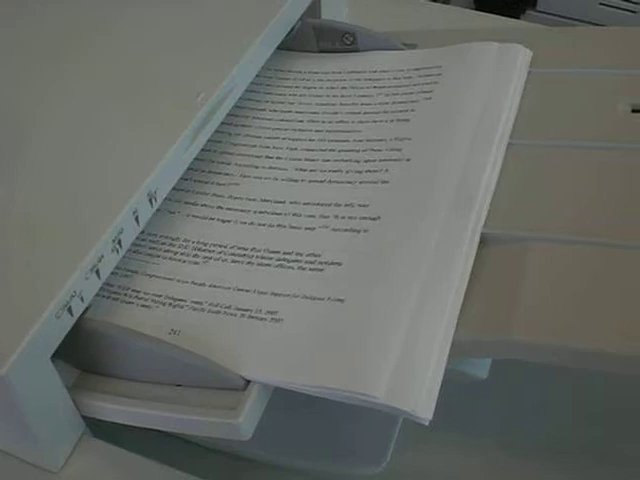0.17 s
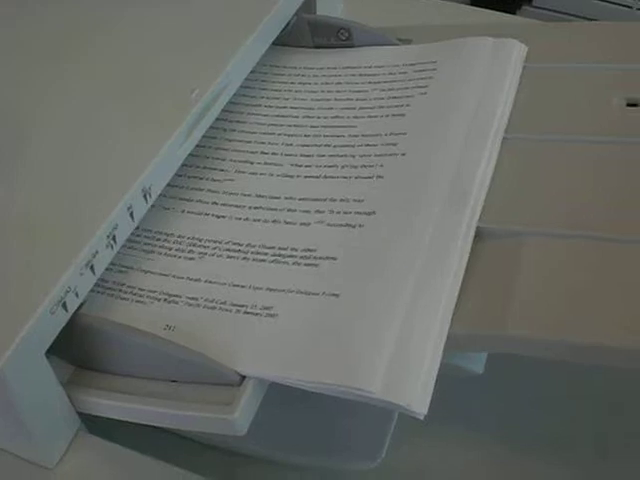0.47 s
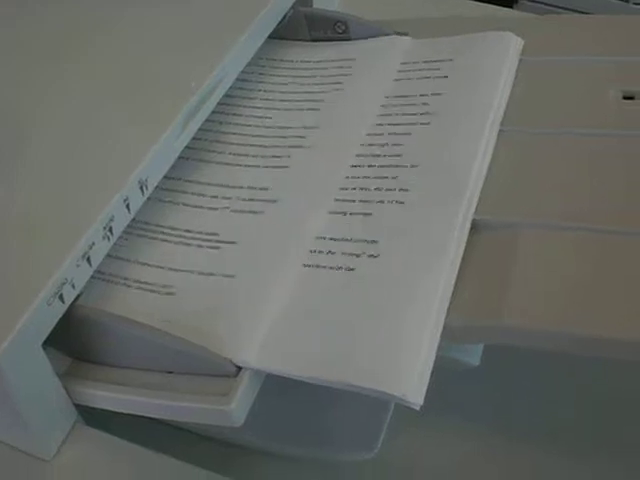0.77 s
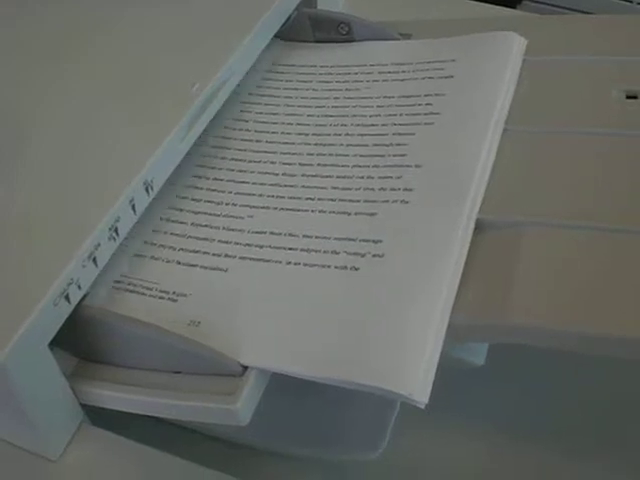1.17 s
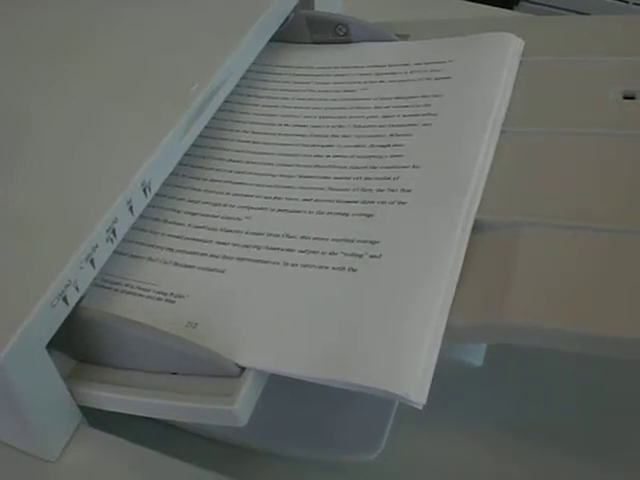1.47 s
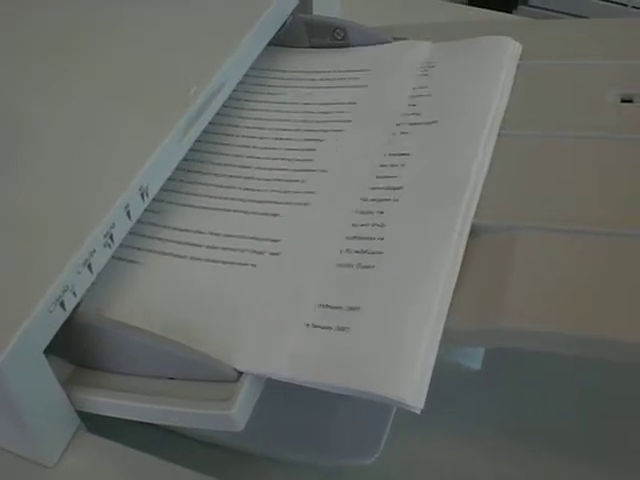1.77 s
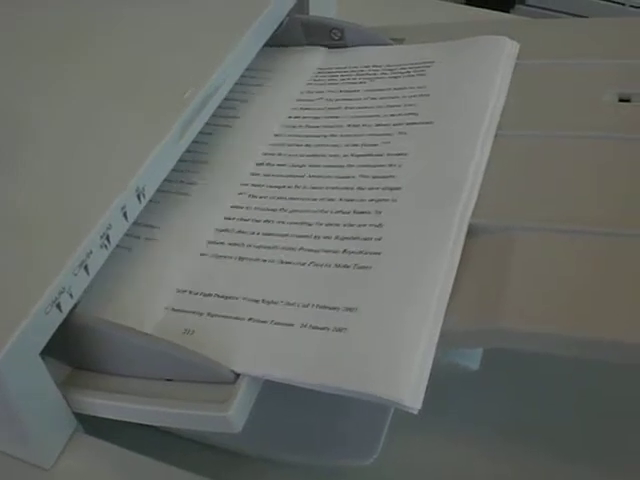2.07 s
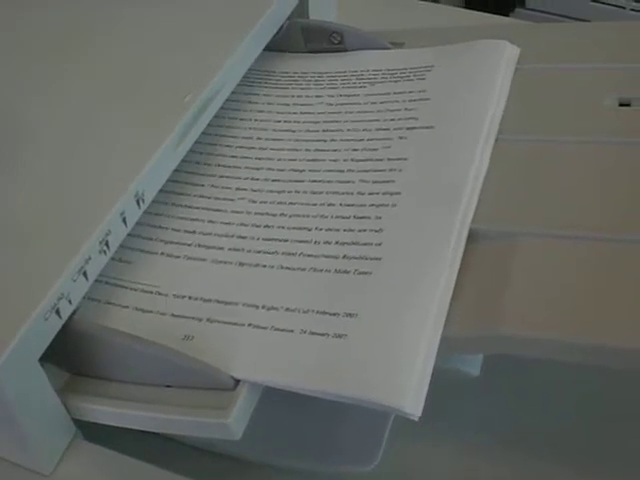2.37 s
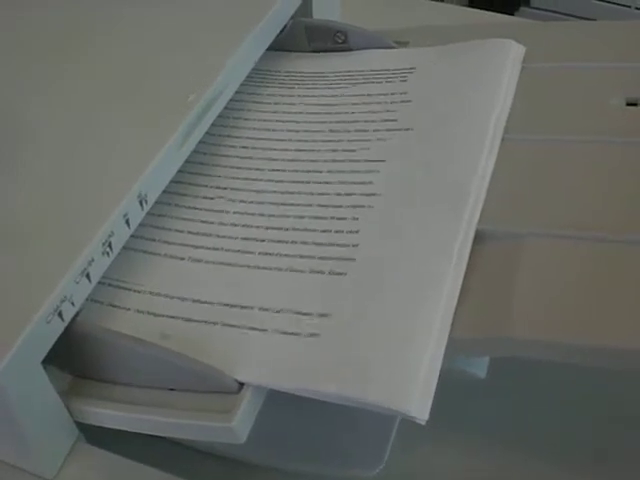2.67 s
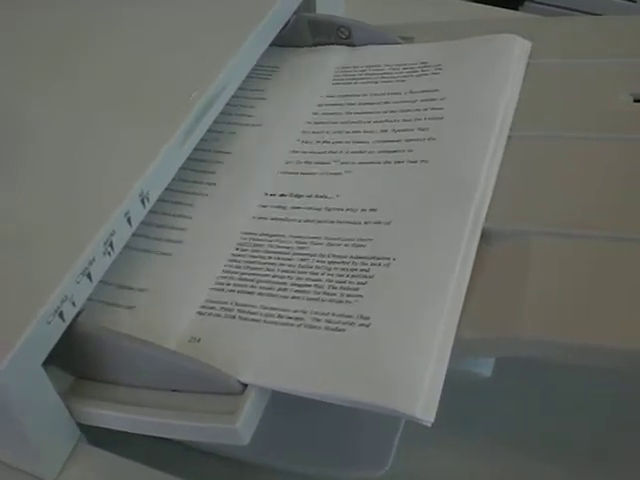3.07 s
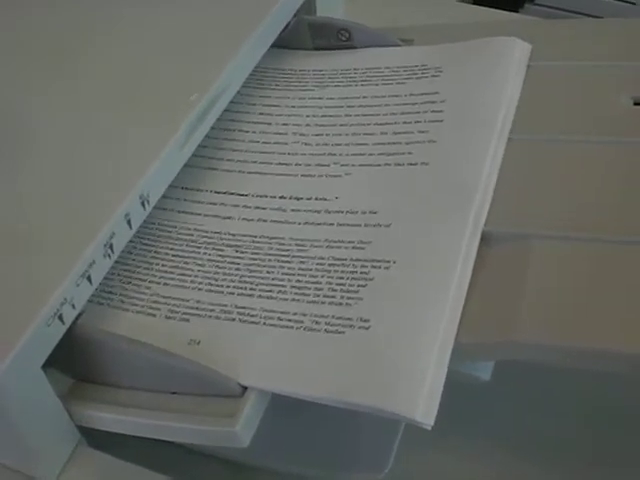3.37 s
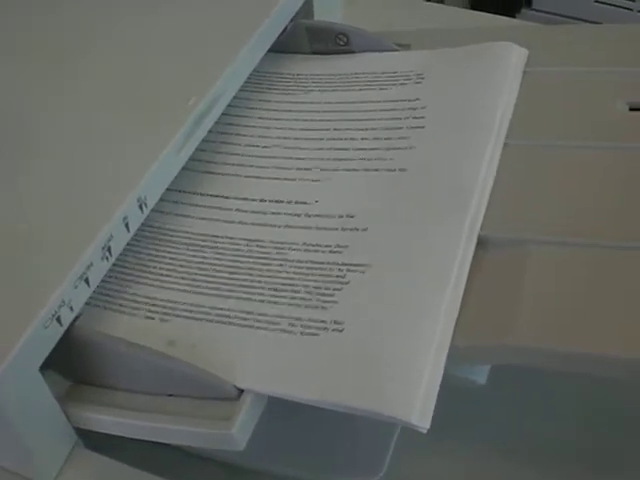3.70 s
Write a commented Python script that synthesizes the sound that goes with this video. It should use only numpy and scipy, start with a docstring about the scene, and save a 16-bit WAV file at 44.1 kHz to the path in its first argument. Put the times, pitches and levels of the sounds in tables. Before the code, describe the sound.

Photocopier running close by: whirring gears, motor whine, paper hiss and plastic clacks per sheet

```python
"""A photocopier delivers about one sheet a second onto a stack, heard from just above the tray.
The sound cuts in on the whirr of fans and gears (shaped noise and ticks), dull clunks and a thin whistle.
Two motor whines (wavering sines) enter, the whistle stops and paper hisses through the guides (noise).
Per sheet a plastic flap clacks, exit rollers hum and rattle, and a clutch lets go with a thud (noise bursts
through resonances); small parts knock in between."""
import sys
import numpy as np
from scipy import signal
from scipy.fft import rfft, irfft, next_fast_len
from scipy.io import wavfile
from scipy.ndimage import uniform_filter1d

SR = 44100
rng = np.random.default_rng(int(sys.argv[2]) if len(sys.argv) > 2 else 0)


def master(y):
    """Save y as 16-bit WAV."""
    cut = np.clip(np.atleast_2d(y).T, -1, 1)
    pcm = np.round(cut * 32767)  # scale
    wavfile.write(sys.argv[1], SR, pcm.astype(np.int16))


N = 169344

FEED_START_S = 0.375
ROLLER_TURN_HZ = 15
# broad response of the housing: hz, relative_db_per_hz
HOUSING_SPECTRUM = [(50, -13), (150, -20.5), (300, 5.5), (900, -1), (2000, -4.5), (4300, -9), (6000, -18),
                    (10000, -23), (16000, -22)]


def amp(db):
    """Amplitude factor of a level in dB."""
    return 10 ** (np.asarray(db) / 20)


def unit(x):
    """Scale to an rms of 1."""
    return x / np.sqrt(np.mean(x ** 2))


def clock():
    """Time of each sample in s."""
    return np.arange(N) / SR


def walk(rate_hz):
    """Smooth random wander of rms 1: held random values, averaged twice."""
    hold = max(int(SR / rate_hz), 1)
    steps = rng.standard_normal(N)[np.arange(N) // hold]
    return unit(uniform_filter1d(uniform_filter1d(steps, hold), hold))


def gate(start_s, end_s, ramp_s):
    """1 between two times, with straight ramps centred on them."""
    t = clock()
    inside_s = np.minimum(t - start_s, end_s - t)
    return np.clip(inside_s / ramp_s + 0.5, 0, 1)


def body(x, spectrum, modes):
    """Minimum-phase filter: a broad spectrum with resonances on top."""
    n = 2 * next_fast_len(N // 2 + 4096)
    f = np.arange(n // 2 + 1) * SR / n + 1  # 1 Hz offset avoids log(0)
    points = np.array(spectrum)
    db = np.interp(np.log(f), np.log(points[:, 0]), points[:, 1])
    for hz, width_hz, peak_db in modes:
        db = db + peak_db / (1 + (2 * (f - hz) / width_hz) ** 2)
    # folding the cepstrum makes the response causal
    cepstrum = irfft(np.log(amp(db)))
    cepstrum[1:n // 2] *= 2
    cepstrum[n // 2 + 1:] = 0
    response = np.exp(rfft(cepstrum))
    return irfft(rfft(x, n) * response)[:N]


def ticks(rate_hz, scatter_db):
    """Random tiny impacts of uneven size and either sign."""
    hits = rng.random(N) < rate_hz / SR
    sign = np.sign(rng.standard_normal(N))
    size = amp(scatter_db * np.clip(rng.standard_normal(N), -2, 2))
    return unit(hits * sign * size)


def smear(x):
    """Reflections in the housing blur each tick into a short rasp: decaying energy, random signs."""
    decay_s = 0.0036
    tail = np.exp(-2 * np.arange(2048) / SR / decay_s)
    power = np.abs(signal.fftconvolve(x ** 2, tail)[:N])
    return unit(np.sqrt(power) * np.sign(rng.standard_normal(N)))


def rasp(rate_hz, scatter_db):
    """Ticks blurred by the housing."""
    return smear(ticks(rate_hz, scatter_db))


def tone(hz, wander_hz, flutter_db, rate_hz):
    """A motor line that wavers a little in pitch and level, at rms 1."""
    flutter = amp(flutter_db * walk(rate_hz))
    phase = 2 * np.pi * np.cumsum(hz + wander_hz * walk(rate_hz)) / SR
    return unit(np.sin(phase) * flutter)


def turning(hz, depth, wander):
    """Swell of level once per turn of a wheel of slightly uneven speed."""
    speed_hz = hz * (1 + wander * walk(4.81))
    return 1 + depth * np.sin(2 * np.pi * np.cumsum(speed_hz) / SR)


def strikes(blows, spectrum, modes, rise_s, tail_db, tail_s):
    """Each blow starts abruptly, swells as a short chatter of contacts and rings a body, with a faint room tail."""
    first_contact_db = -4.5  # relative to the peak
    t = clock()
    power = np.zeros(N)
    for start_s, level_db, decay_s in blows:
        age = np.maximum(t - start_s, 0)
        fall = np.maximum(age - rise_s, 0)
        attack = (t > start_s) * amp(first_contact_db * np.maximum(1 - age / rise_s, 0))
        ring = np.exp(-2 * fall / decay_s)
        room = amp(tail_db) ** 2 * np.exp(-2 * fall / tail_s)
        power += (amp(level_db) * attack) ** 2 * (ring + room)
    chatter = np.sign(rng.standard_normal(N))
    steady_rms = np.std(body(chatter, spectrum, modes))
    return body(chatter * np.sqrt(power), spectrum, modes) / steady_rms


def flap():
    """The plastic flap and its bounces: bright, short clacks ringing high resonances."""
    # start_s, level_db, decay_s
    clacks = [(.339, -37, .004), (.552, -34, .006), (.5765, -16, 0.0043), (.589, -13.5, 0.0041),
              (.596, -24, 0.0054), (.6254, -30, .012), (.689, -25.5, 0.0049), (1.4914, -35, .004),
              (1.581, -18.5, 0.0067), (1.5862, -13.5, 0.0056), (1.5995, -21, 0.0045),
              (1.6221, -27.5, 0.011), (1.686, -31, .006), (1.6914, -26, 0.0041), (2.078, -36, .008),
              (2.467, -34, 0.004), (2.5884, -14.5, 0.0067), (2.6243, -22, 0.0047), (2.6365, -19.5, 0.0041),
              (2.6485, -17, 0.0021), (2.746, -29, .008), (3.1405, -31, .005), (3.528, -35, .008),
              (3.5777, -28, 0.0039), (3.641, -29, .006), (3.6475, -16, 0.0098), (3.6869, -19.5, 0.0075),
              (3.7054, -24.5, 0.0061), (3.7942, -25, 0.0054), (3.8201, -32, 0.011)]
    # hz, relative_db_per_hz
    spectrum = [(100, -20), (600, -14), (2000, 0), (4000, 0), (8000, 1), (11000, 0.5), (14500, 0),
                (16000, -1.5)]
    # hz, width_hz, peak_db over the spectrum
    modes = [(2720, 260, 7), (3200, 200, 6), (4410, 160, 5), (5850, 200, 6), (6350, 380, 9), (9000, 200, 6),
             (9350, 340, 10), (10300, 200, 5), (11800, 240, 7), (12750, 300, 5), (13300, 260, 11)]
    return strikes(clacks, spectrum, modes, rise_s=0.0013, tail_db=-32, tail_s=0.025)


def clutches():
    """Clutches and levers thud inside the housing and ring its lower resonances."""
    # start_s, level_db, decay_s
    thuds = [(.33, -22.5, 0.003), (.364, -39, 0.0065), (.577, -24, .01), (.594, -18, 0.01),
             (.687, -27, 0.0053), (.909, -16, 0.0087), (1.016, -17.5, 0.012), (1.318, -27, 0.011),
             (1.471, -26, 0.016), (1.581, -26, 0.01), (1.601, -22.5, 0.019), (1.687, -17, 0.004),
             (1.722, -25, 0.0061), (1.9685, -13, 0.0078), (2.076, -22, 0.01), (2.167, -26, 0.0091),
             (2.533, -23.5, 0.0072), (2.647, -20.5, 0.014), (2.748, -22.5, 0.012), (3.0145, -14, 0.0095),
             (3.12, -20.5, 0.01), (3.139, -15.5, 0.0037), (3.218, -24, 0.011), (3.578, -18.5, .009),
             (3.689, -26, 0.013), (3.708, -21.5, 0.017), (3.796, -18.5, 0.0063), (3.823, -21.5, 0.0063)]
    # hz, width_hz, peak_db over the spectrum
    modes = [(330, 41, 1.7), (639, 33, 8.1), (1210, 210, 4.9), (1810, 110, 4.9), (2670, 160, 7.5),
             (3170, 180, 5.6), (4130, 680, 3.7)]
    return strikes(thuds, HOUSING_SPECTRUM, modes, rise_s=0.0022, tail_db=-20.5, tail_s=0.09)


def exit_rollers():
    """A stepper motor hums and the rollers rattle while a sheet is pushed out."""
    # start_s, end_s, relative_db
    runs = [(0.57, 0.904, -1), (1.597, 1.987, -1.5), (2.634, 3.04, -2), (3.731, 3.95, -0.5)]
    # hz, rms_db before the run level
    tones = [(361, -27), (540, -38.5), (1083, -51)]
    # hz, relative_db_per_hz
    spectrum = [(50, -32), (170, -4), (320, -4), (700, 4), (1100, 2.5), (1800, 0), (3000, -4.5),
                (5000, -11), (7000, -17.5), (11500, -16), (16000, -20)]
    # hz, width_hz, peak_db over the spectrum
    modes = [(540, 30, 4), (890, 60, 4), (2385, 120, 4), (2860, 100, 5), (4235, 110, 10), (4820, 130, 5)]
    rattle_db, hum_delay_s = -27.5, 0.03  # the hum builds up after the rollers start
    running = sum(amp(db) * gate(start, end, 0.041) for start, end, db in runs)
    humming = sum(amp(db) * gate(start + hum_delay_s, end, 0.035) for start, end, db in runs)
    contacts = rng.standard_normal(N) + rasp(rate_hz=420, scatter_db=3)
    rattle = contacts * turning(ROLLER_TURN_HZ, depth=0.3, wander=0.02)
    rattle = amp(rattle_db) * unit(body(rattle, spectrum, modes))
    hum = sum(amp(db) * tone(hz, wander_hz=1.6, flutter_db=1.4, rate_hz=45) for hz, db in tones)
    return humming * hum + running * rattle


def paper():
    """Sheets slide through the guides with a fine, faintly ringing hiss that pulses with the rollers."""
    # pauses of the hiss between sheets: start_s, end_s
    gaps = [(.485, 0.59), (1.51, 1.63), (2.49, 2.59), (3.495, 3.85)]
    # hz, relative_db_per_hz
    spectrum = [(800, 4), (2500, 7), (5000, 3.5), (7000, 1), (11500, 3.5), (15700, -1.5)]
    # guide resonances: hz, width_hz, peak_db over the spectrum
    modes = [(6500, 400, 2), (8500, 250, 3), (9297, 90, 4), (11030, 140, 4), (11800, 50, 6),
             (13291, 120, 3)]
    sliding = gate(FEED_START_S, np.inf, 0.02) - sum(gate(start, end, 0.023) for start, end in gaps)
    hiss = unit(body(rng.standard_normal(N), spectrum, modes))
    pulse = turning(ROLLER_TURN_HZ, depth=0.12, wander=0.011)
    level_db = -40 + 1.1 * walk(45)
    return sliding * hiss * pulse * amp(level_db)


def motors():
    """The main drive whines steadily; the transport motor swells for each sheet; a thin whistle precedes the feed."""
    # main drive: hz, rms_db
    drive_tones = [(322, -46), (882.9, -45.5), (1442.3, -41.5), (2884.6, -52)]
    # transport runs: start_s, end_s, relative_db
    transport_runs = [(0.417, 1.136, -5), (1.56, 2.063, -1.5), (2.56, 3.265, -5), (3.62, 3.95, -10)]
    run_db, idle_db = -36.5, -44.5
    whine = sum(amp(db) * tone(hz, wander_hz=1.3, flutter_db=1.8, rate_hz=22) for hz, db in drive_tones)
    swells = sum(amp(run_db + db) * gate(start, end, 0.053) for start, end, db in transport_runs)
    transport = (amp(idle_db) + swells) * tone(1291.5, wander_hz=1, flutter_db=2, rate_hz=20)
    whistle = amp(-54) * tone(14460, wander_hz=25, flutter_db=1, rate_hz=150)
    whines_on = gate(0.325, np.inf, 0.02)
    before_feed = gate(-np.inf, FEED_START_S, 0.02)
    return whines_on * (whine + transport) + before_feed * whistle


def drive():
    """Fan air and rasping gear teeth in the housing, with added rasp when the gears work harder."""
    # spells of load: start_s, end_s, level_db
    loads = [(.355, 0.55, -31), (0.927, 1.107, -35), (1.455, 1.543, -30.5), (1.984, 2.23, -41),
             (2.57, 2.657, -30.5), (3.03, 3.347, -34.5), (3.493, 3.577, -34)]
    # hz, relative_db_per_hz
    spectrum = [(25, -38), (45, -33), (65, -13), (90, -11.5), (140, -5), (220, 0), (350, 0.5), (500, -3),
                (800, -5.5), (1100, -8.5), (2000, -12), (4000, -14.5), (6500, -20.5), (10000, -22.5),
                (12000, -27), (16000, -33)]
    # hz, width_hz, peak_db over the spectrum
    modes = [(166.2, 32, 6), (316, 57, 4.5), (913, 27, 2.5), (1290, 540, 3.8), (2420, 310, 5.8)]
    teeth = rasp(rate_hz=450, scatter_db=1.5) * turning(149.4, depth=0.32, wander=0.0056)
    air = rng.standard_normal(N)
    level_db = -29.5 + walk(25.04)
    whirr = unit(body(air + amp(-1.5) * teeth, spectrum, modes)) * amp(level_db)
    strain = unit(body(rasp(rate_hz=1100, scatter_db=2.5), HOUSING_SPECTRUM, []))
    return whirr + strain * sum(amp(db) * gate(start, end, 0.058) for start, end, db in loads)


def loose_parts():
    """Play in the gear train makes small dull clunks all the time."""
    # hz, relative_db_per_hz
    spectrum = [(50, -30), (120, -5), (200, -3.5), (400, 0), (800, -4), (1500, -13), (4000, -22),
                (16000, -45)]
    # hz, width_hz, peak_db over the spectrum
    modes = [(300, 61, 7), (461, 21, 8), (705, 76, 11), (883, 54, 13.5)]
    return amp(-40.5) * unit(body(rasp(rate_hz=25, scatter_db=3), spectrum, modes))


def scene():
    """Sum of all sources, as one channel."""
    sheets = flap() + clutches() + exit_rollers() + paper()
    machine = motors() + drive() + loose_parts()
    return (sheets + machine)[None]


def record(dry):
    """The microphone has two narrow dips in the treble; the sound cuts in and the top is cut off."""
    # hz, width_hz, peak_db
    dips = [(7230, 155, -7), (7780, 75, -23)]
    cut_in_s, top_hz = 0.172, 15700
    flat = [(20, 0), (20000, 0)]
    heard = body(dry[0], flat, dips) * gate(cut_in_s, np.inf, 0.0006)
    lowpass = signal.ellip(10, 0.2, 70, top_hz, fs=SR, output="sos")
    return signal.sosfilt(lowpass, heard)[None]


dry = scene()
out = record(dry)
master(out)
```